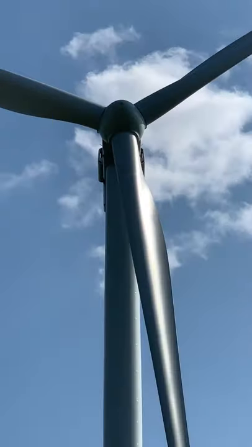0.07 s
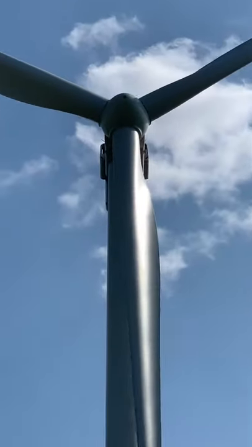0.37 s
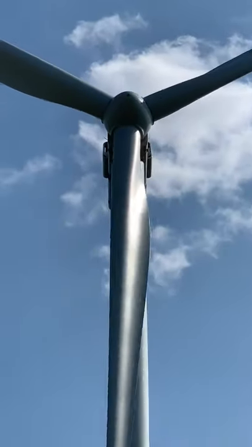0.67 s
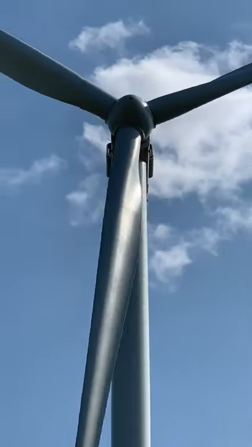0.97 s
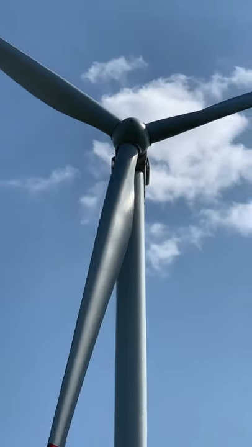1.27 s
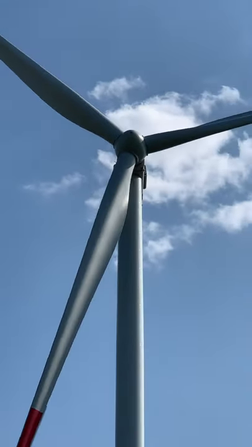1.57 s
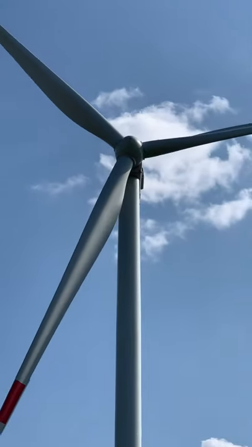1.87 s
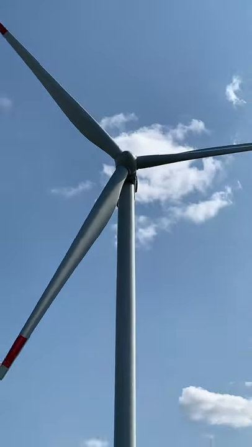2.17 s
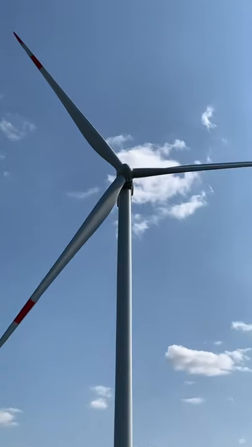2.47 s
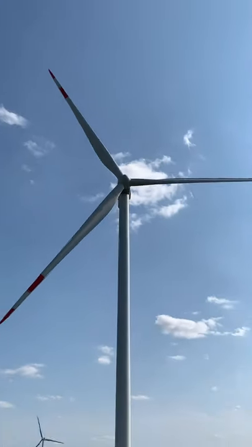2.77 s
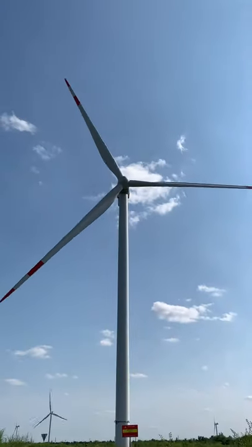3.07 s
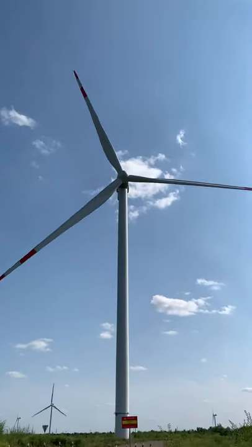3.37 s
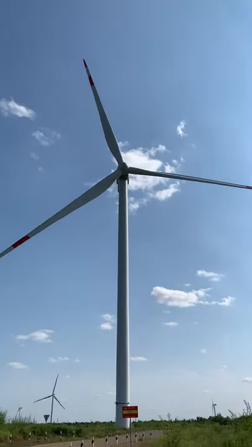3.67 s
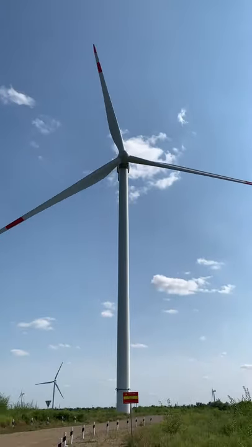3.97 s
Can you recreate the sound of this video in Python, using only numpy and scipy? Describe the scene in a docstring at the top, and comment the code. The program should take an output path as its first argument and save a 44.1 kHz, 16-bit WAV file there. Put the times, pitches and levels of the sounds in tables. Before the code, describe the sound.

A wind turbine drones low throughout, its blades rushing softly, a little stronger until 1.7 seconds. A switch clicks at 0.4 seconds. A faint, high warbling whine starts near 0.9 seconds, climbs from 2.4 and fades by 3.4. From 2.8 seconds, louder gusts buffet the microphone, with light rustles, a dull tick and a tiny squeak. A faint insect-like pulsing and thin hiss lie behind.

```python
"""A wind turbine in an open field, on one microphone: a low drone and the rush of the blades,
stronger while one sweeps down. A switch clicks, then a faint warbling whine starts, probably
a motor drive, and later climbs away. Towards the end gusts buffet the microphone and something
rustles, ticks and squeaks softly close by. Behind it all, a faint pulsing in the grass and a thin hiss."""
import sys
import numpy as np
from scipy import signal
from scipy.fft import rfft, irfft
from scipy.io import wavfile
from scipy.ndimage import uniform_filter1d

SR = 44100
rng = np.random.default_rng(int(sys.argv[2]) if len(sys.argv) > 2 else 0)


def store_wav(level_fs):
    """Save 16-bit WAV to argv[1]."""
    pcm = np.round(np.clip(np.atleast_2d(level_fs), -1, 1) * 32767)
    wavfile.write(sys.argv[1], SR, pcm.T.astype(np.int16))


N = 176400
TIME_S = np.arange(N) / SR

# resonances of the turbine's drone: pitch_hz, width_hz, level_db
DRONE_RESONANCES = [(62.8, 18, -55.5), (103.6, 42, -67.5), (194.8, 40, -68), (306, 37, -74),
                    (362.6, 55, -73)]
# swell of the drone: time_s, gain_db
DRONE_SWELL = [(0, -3), (1.0, -1.5), (1.35, 2.5), (2.55, 0.5), (2.75, -2), (4, 0)]
# spectrum of the blades' rush: frequency_hz, relative_db
RUSH_SPECTRUM = [(30, -14), (55, -4), (140, 4), (250, -0.5), (460, -3), (600, -1.5), (850, -5), (1100, -12),
                 (1400, -20.5), (2200, -33.5), (5000, -52), (16000, -86)]
# the rush at the microphone: time_s, level_db
RUSH_LEVELS = [(0, -59.5), (.07, -58.3), (.37, -61.5), (.68, -59.7), (.97, -61.7), (1.3, -60.8),
               (1.56, -61.5), (1.685, -58.8), (1.72, -64), (1.79, -66.3), (2.2, -65.8), (2.6, -64.5),
               (3.0, -65.3), (3.7, -64.3), (4, -63)]

def turbine():
    """Out in the field the machine drones in low resonances under the fluttering rush of its blades."""
    drone = sum(undb(db) * even(resonance(hz, width), .12) for hz, width, db in DRONE_RESONANCES)
    flutter_db = .7 * wander(9.7)
    rush = coloured(RUSH_SPECTRUM) * undb(curve(RUSH_LEVELS) + flutter_db)
    return drone * undb(curve(DRONE_SWELL)) + rush


# course of the whine's direct tone: time_s, pitch_hz, level_db
WHINE_COURSE = [(.918, 4020, -77), (1.5, 4013, -78.5), (1.8, 3990, -76), (2.06, 3983, -74.5),
                (2.28, 3985, -78.5), (2.44, 4046, -77.5), (2.58, 4650, -78.5), (2.68, 5020, -76.5),
                (2.76, 5330, -88), (2.98, 6230, -95), (3.12, 6900, -101), (3.3, 7520, -91),
                (3.42, 7800, -102)]
# its echoes off the ground and nearby steel: lag_s, gain_db
WHINE_ECHOES = [(.00325, -7), (.0085, -12), (.021, -14)]

def whine():
    """A thin warbling tone holds, then climbs and fades; drifting echoes make it flutter."""
    warble_per_s, depth_hz, climb_s, edge_s = 25.03, 182, 2.417, .0044
    crest_s = np.where(TIME_S < climb_s, .928, 2.507)  # the warble restarts for the climb
    warble_hz = depth_hz * np.cos(2 * np.pi * warble_per_s * (TIME_S - crest_s))
    pitch_hz = curve(WHINE_COURSE) + warble_hz + 11 * wander(200)
    start_s, end_s = WHINE_COURSE[0][0], WHINE_COURSE[-1][0]
    gate = np.clip(np.minimum(TIME_S - start_s, end_s - TIME_S) / edge_s, 0, 1)
    level_db = curve(WHINE_COURSE, column=2) + 1.1 * wander(77)
    direct = gate * undb(level_db) * tone(pitch_hz)
    echoes = sum(undb(db) * np.interp(TIME_S - lag_s - .00004 * wander(1.3), TIME_S, direct)
                 for lag_s, db in WHINE_ECHOES)
    return direct + echoes


# ringing modes of the switch: pitch_hz, relative_db, t60_s
SWITCH_MODES = [(1730, -10, 0.05), (1840, -3, 0.023), (3050, -7, 0.01), (3450, -2.5, 0.022),
                (3540, -5, 0.027), (3900, -13, .01), (5250, -23, 0.011)]

def switch_click():
    """A switch snaps with a hard contact, ahead of the whine."""
    return undb(-56) * strike(SWITCH_MODES, start_s=.4351, attack_s=.00026, tail_db=-16.5, tail_t60_s=.12)


# steady push of the wind on the microphone: time_s, level_db
WIND_PUSH = [(0, -85.5), (2.76, -72), (2.82, -52.5), (3.0, -45), (3.15, -49.5), (3.35, -53.5), (3.45, -42),
             (3.75, -45), (4, -46)]
# single buffets: peak_s, half_length_s, rumble_db, flutter_db
WIND_BUFFETS = [(2.959, 0.012, -39, -43.5), (3.059, 0.011, -34, -55), (3.108, 0.012, -45.5, -49.5),
                (3.279, 0.0076, -43, -68), (3.425, 0.0093, -31, -44.5), (3.462, 0.013, -30.5, -46.5),
                (3.526, 0.0065, -29.5, -53.5), (3.651, 0.02, -37, -61), (3.719, 0.0076, -28, -48),
                (3.819, 0.0059, -32.5, -58), (3.894, 0.013, -33, -54.5), (3.977, 0.011, -32.5, -45)]
# spectrum of the wind's rumble: frequency_hz, relative_db
RUMBLE_SPECTRUM = [(18, -49.5), (35, -15.5), (50, 4), (72, -1.5), (100, -3), (130, -13), (200, -29),
                   (300, -47), (600, -75), (3000, -120)]
# spectrum of the flutter in a buffet: frequency_hz, relative_db
FLUTTER_SPECTRUM = [(30, -46), (60, -25.5), (120, -2), (200, 2.5), (280, -8), (370, -22.5), (700, -47),
                    (3000, -110)]

def wind_on_microphone():
    """Eddies hit the microphone: each is a short burst of rumble with a brighter flutter."""
    buffet_power = sum((undb(db) * swell(at, half)) ** 2 for at, half, db, _ in WIND_BUFFETS)
    rumble_gain = np.sqrt(undb(curve(WIND_PUSH)) ** 2 + buffet_power)
    flutter_gain = sum(undb(db) * swell(at, half) for at, half, _, db in WIND_BUFFETS)
    rumble = rumble_gain * even(coloured(RUMBLE_SPECTRUM), .031)
    return rumble + flutter_gain * even(coloured(FLUTTER_SPECTRUM), .014)


# ringing modes of the tick: pitch_hz, relative_db, t60_s
DRY_TICK_MODES = [(1300, 0, .016), (1510, -1, .017), (1700, -1.5, .017)]

def dry_tick():
    """Close by, among the gusts, a softer contact gives a duller tick."""
    tick = strike(DRY_TICK_MODES, start_s=3.4332, attack_s=.0014, tail_db=-12.5, tail_t60_s=.098)
    return undb(-56.5) * tick


# soft rustles close by: peak_s, half_length_s, centre_hz, width_hz, level_db
CLOSE_RUSTLES = [(0.035, 0.014, 9600, 9000, -80.5), (0.118, 0.028, 9000, 10000, -79),
                 (2.568, .02, 1500, 600, -80), (3.216, 0.016, 1830, 1200, -77.5),
                 (3.3, 0.027, 1950, 1600, -75.5), (3.348, 0.013, 1950, 1700, -76),
                 (3.865, 0.016, 7540, 5000, -80.5), (3.966, 0.016, 8500, 6000, -82)]

def rustles():
    """Short, light, grainy scuffs near the microphone, each in its own band."""
    def band(hz, width):
        return noise(lambda f: np.exp(-2 * ((f - hz) / width) ** 2))
    grain = even(undb(2.5 * wander(170)), .026)
    scuffs = sum(undb(db) * swell(at, half) * band(hz, width) for at, half, hz, width, db in CLOSE_RUSTLES)
    return grain * scuffs


def squeak():
    """A faint, unsteady tone slides briefly down, close by."""
    peak_s, fall_hz_per_s = 3.786, 8900
    pitch_hz = 2020 - fall_hz_per_s * (TIME_S - peak_s) + 85 * wander(200)
    return undb(-82) * swell(peak_s, half_length_s=.012) * tone(pitch_hz)


# faint rasp in the grass, at the top of its strokes: time_s, level_db
RASP_LEVELS = [(0, -104), (1.1, -99), (1.6, -85), (2.7, -84.5), (3.1, -91), (4, -84)]

def insect():
    """Perhaps a grasshopper: a high rasp that swells softly with each stroke."""
    strokes_per_s, crest_s, depth = 9.5, 1.815, .61
    stroke = 1 - depth * np.sin(np.pi * strokes_per_s * (TIME_S - crest_s)) ** 2
    return undb(curve(RASP_LEVELS)) * stroke * resonance(8700, width_hz=5200)


# spectrum of the background hiss: frequency_hz, relative_db
HISS_SPECTRUM = [(200, -5.5), (2000, 1), (4500, 0), (8500, -0.75), (10500, -1.5), (13000, -1.5),
                 (13800, -.5), (15000, -10), (16000, -2)]

def hiss():
    """A thin, almost steady hiss behind everything."""
    return coloured(HISS_SPECTRUM) * undb(-78.5 + .12 * wander(8.6))


def strike(modes, start_s, attack_s, tail_db, tail_t60_s):
    """A small blow rings briefly in its modes and scatters into a short noisy tail."""
    age = np.maximum(TIME_S - start_s, 0)
    ring = sum(undb(db - 60 * age / t60) * np.sin(2 * np.pi * hz * age) for hz, db, t60 in modes)
    scatter = sum(undb(db) * resonance(hz, hz / 5) for hz, db, _ in modes)
    tail = scatter * undb(tail_db - 60 * age / tail_t60_s)
    onset = 1 - np.exp(-(age / attack_s) ** 2)
    return (ring + tail) * onset


def undb(db):
    """Decibels to gain."""
    return 10 ** (np.asarray(db) / 20)


def curve(rows, column=1):
    """One column of a table, joined by straight lines in time."""
    rows = np.array(rows)
    return np.interp(TIME_S, rows[:, 0], rows[:, column])


def tone(pitch_hz):
    """A sine of rms 1 that follows a moving pitch."""
    return np.sqrt(2) * np.sin(2 * np.pi * np.cumsum(pitch_hz) / SR)


def noise(gain):
    """Noise of rms 1, shaped by a gain at each frequency."""
    hz = np.maximum(np.fft.rfftfreq(N, 1 / SR), 1)
    shaped = irfft(rfft(rng.standard_normal(N)) * gain(hz), N)
    return shaped / np.std(shaped)


def coloured(spectrum):
    """Noise whose spectrum runs through (frequency_hz, relative_db) points."""
    hz, db = np.array(spectrum).T
    return noise(lambda f: undb(np.interp(np.log(f), np.log(hz), db)))


def resonance(hz, width_hz):
    """Noise through a resonance, applied twice for steep skirts."""
    return noise(lambda f: 1 / (1 + ((f * f - hz * hz) / (f * width_hz)) ** 2))


def even(x, seconds):
    """Holds the power of a noise steady over the given time."""
    window = max(int(seconds * SR), 2)
    power = uniform_filter1d(uniform_filter1d(x * x, window), window)
    return x / np.sqrt(power + 1e-9)


def wander(rate_hz):
    """Random drift with spread 1, mostly slower than the given rate."""
    return noise(lambda f: 1 / (1 + (f / rate_hz) ** 4))


def swell(peak_s, half_length_s):
    """A bell-shaped rise and fall."""
    return np.exp(-.5 * ((TIME_S - peak_s) / half_length_s) ** 2)


def scene():
    """The open field from one spot, in mono: turbine, wind, close sounds and background."""
    background = hiss() + insect()
    close_by = dry_tick() + rustles() + squeak()
    return (turbine() + whine() + switch_click() + wind_on_microphone() + close_by + background)[None]


def record(dry):
    """The microphone loses the deepest bass, the very end is eased out and the recorder cuts the top."""
    low_cut_hz, top_hz, fade_s = 35, 15650, .004
    low_cut = signal.butter(4, low_cut_hz, "high", fs=SR, output="sos")
    top_cut = signal.ellip(10, .2, 70, top_hz, fs=SR, output="sos")
    fade = np.sin(np.pi / 2 * np.clip(TIME_S[::-1] / fade_s, 0, 1)) ** 2
    return signal.sosfilt(top_cut, fade * signal.sosfilt(low_cut, dry))


dry = scene()
out = record(dry)
store_wav(out)
```